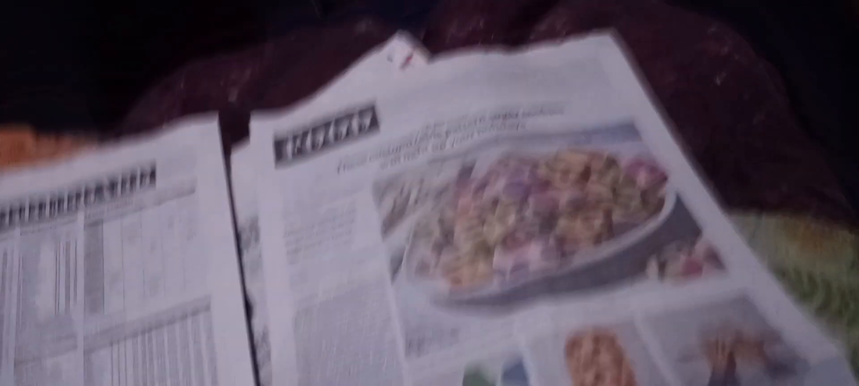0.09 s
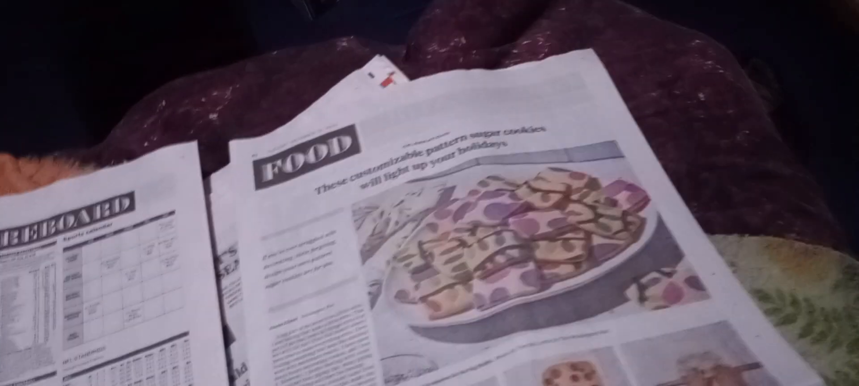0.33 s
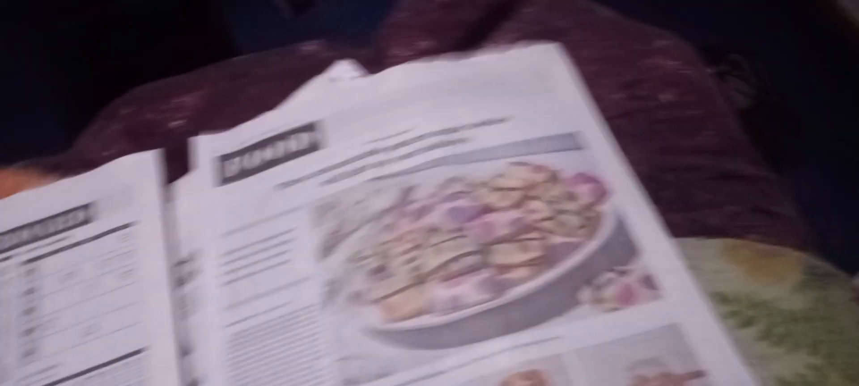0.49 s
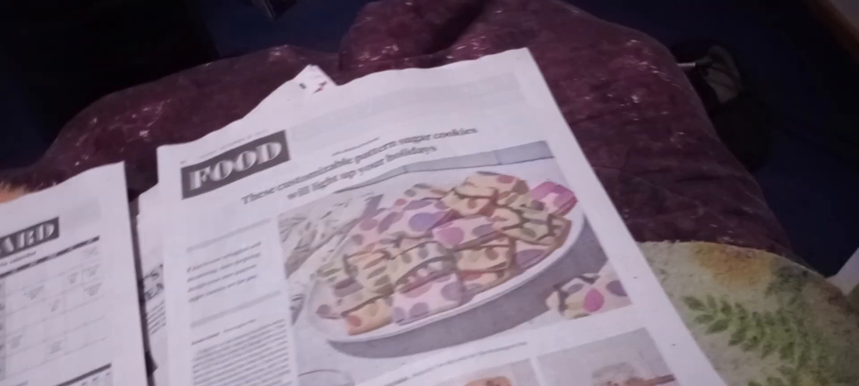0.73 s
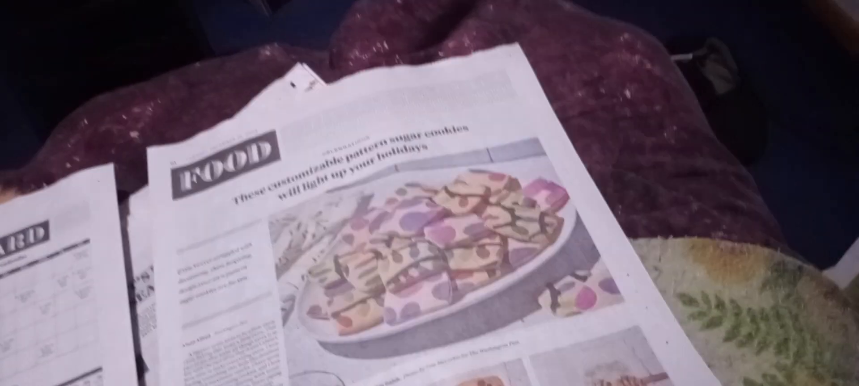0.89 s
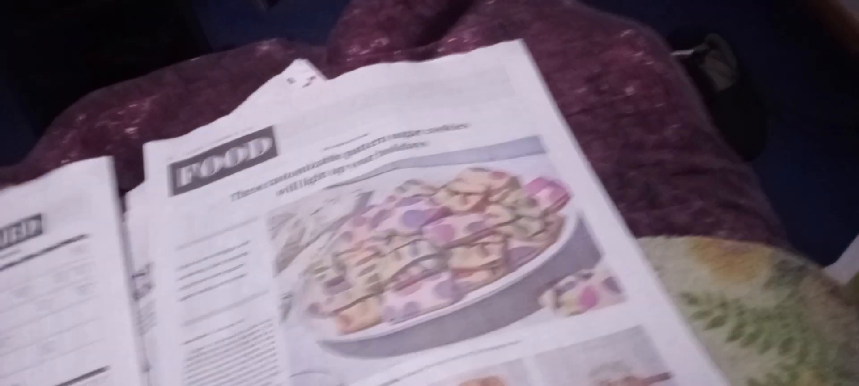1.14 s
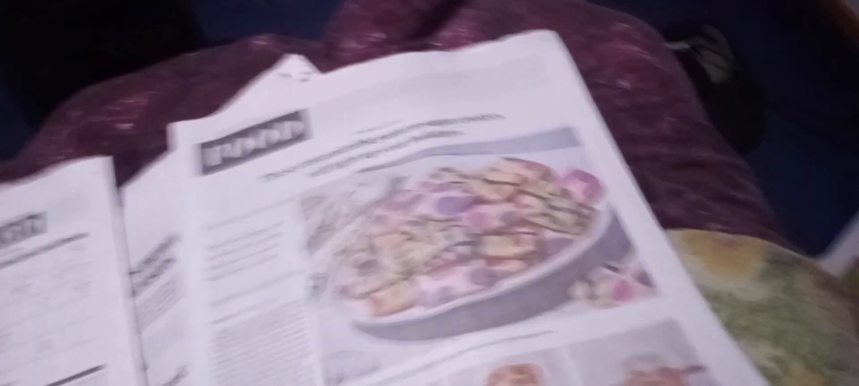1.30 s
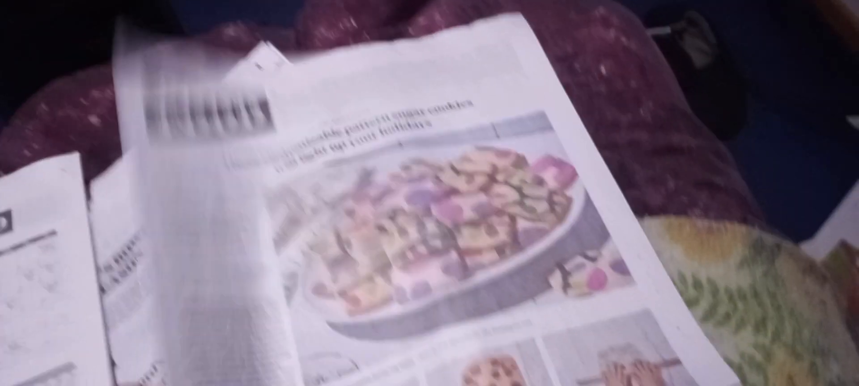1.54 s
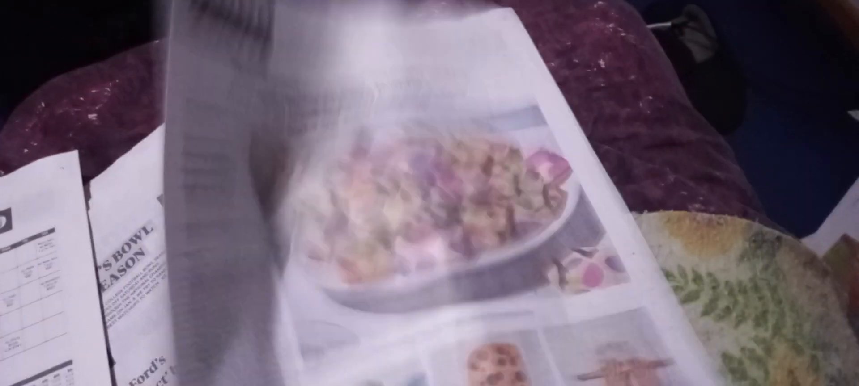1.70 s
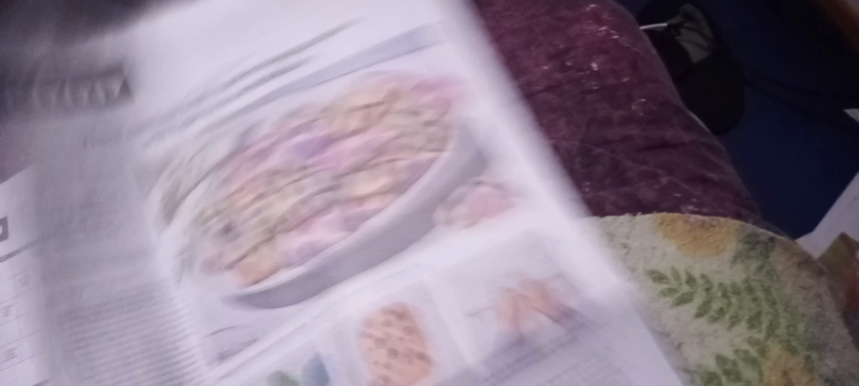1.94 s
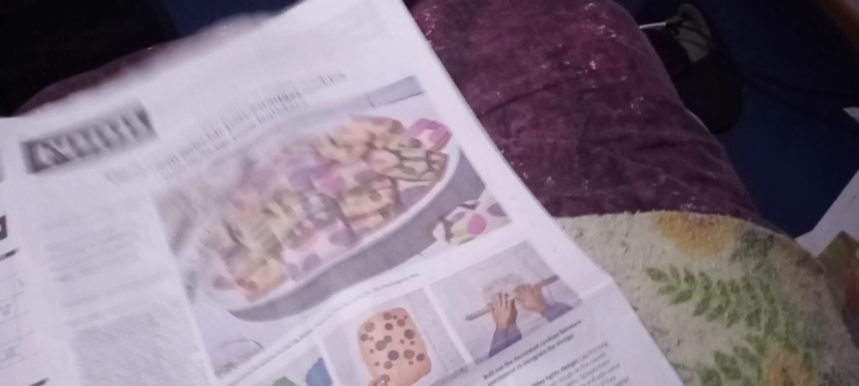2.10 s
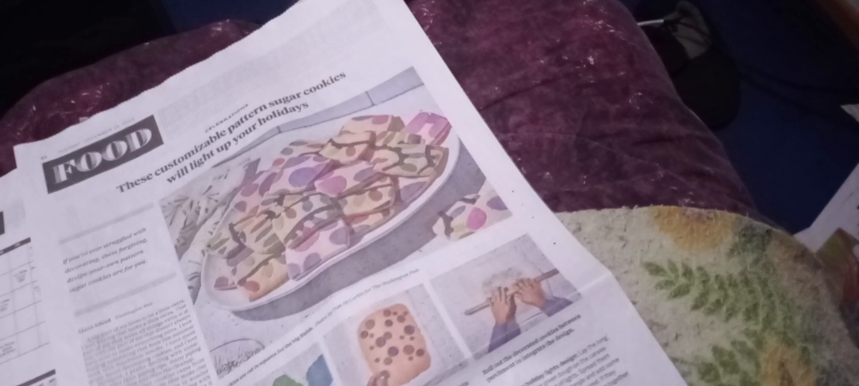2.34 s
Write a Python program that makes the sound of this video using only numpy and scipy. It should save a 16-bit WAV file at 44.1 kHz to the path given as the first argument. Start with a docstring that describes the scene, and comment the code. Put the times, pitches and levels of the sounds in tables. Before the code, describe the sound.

Thin newsprint sheets being turned by hand, crisp crackling bursts with sharp little snaps, close up

```python
"""Turning newsprint pages

Pages are lifted, slid and turned by hand close to a camera in a quiet, soft room.
Sliding sheets hiss (noise), creases crackle (dense tiny cracks), folds snap (short ringing bursts).
A drifting narrow noise is one sheet gliding on another; a low rumble and a steady hiss lie beneath.
Two unlike microphone ports colour the paper: the left loud, boxy and a little late, the right faint and bright."""
import sys
import numpy as np
from scipy import signal
from scipy.fft import rfft, irfft
from scipy.io import wavfile
from scipy.ndimage import uniform_filter1d

SR = 44100
rng = np.random.default_rng(int(sys.argv[2]) if len(sys.argv) > 2 else 0)


def persist_wave(psi):
    """Save psi, clipped to +-1, as 16-bit WAV."""
    counts = np.round(np.clip(psi, -1, 1) * 32767).astype(np.int16)
    wavfile.write(sys.argv[1], SR, np.atleast_2d(counts).T)


def elevation(decibels):
    """Turn decibel levels (scalar or array-like) into linear amplitude ratios."""
    levels = np.asarray(decibels, float)
    return 10 ** (levels / 20)


N = 110250  # samples, 2.5 s
HZ = np.fft.rfftfreq(N, 1 / SR) + 1e-3  # every frequency, nudged off zero so that we can divide by it

# level of the crackle of creases (time [s], middle [dB], body [dB], edge [dB])
CRACKLE_LEVELS = [(0, -78, -81, -78.5), (.19, -68, -75, -66.5), (.22, -40, -53, -52.5),
                  (.32, -60, -64, -60), (.35, -46.5, -71, -61), (.36, -41.5, -56, -43),
                  (.405, -43, -50.5, -41.5), (.49, -61.5, -69, -60.5), (.505, -52, -43, -67),
                  (.513, -45, -38, -43), (.535, -45, -59.5, -51.5), (.7, -41.5, -50.5, -47),
                  (.81, -33, -48.5, -45), (.91, -38.5, -58, -35), (.935, -32, -39, -43),
                  (.975, -27.5, -39, -31.5), (1.05, -40.5, -49.5, -48), (1.2, -44, -57.5, -46),
                  (1.27, -59, -67, -80), (1.51, -63, -86, -70), (1.535, -48, -57.5, -77),
                  (1.6, -53, -76, -63), (1.645, -41, -45.5, -40.5), (1.71, -38.5, -54, -39),
                  (1.81, -32, -42, -42), (1.93, -36, -52.5, -42), (2.1, -38.5, -46, -59),
                  (2.15, -53, -72, -69), (2.2, -54.5, -63, -56), (2.33, -51.5, -70, -58),
                  (2.44, -58.5, -74, -61), (2.5, -55, -74, -47.5)]
# level of the hiss of sliding sheets (time [s], treble [dB], top [dB])
SLIDE_LEVELS = [(0, -84.5, -100), (.19, -75, -79), (.225, -43.5, -57), (.28, -58.5, -66), (.32, -55.5, -92),
                (.35, -53, -70), (.36, -44.5, -66), (.41, -44.5, -63), (.49, -57, -89), (.52, -51, -65),
                (.56, -51.5, -81), (.7, -43, -59), (.8, -34.5, -52), (.88, -40, -46.5), (1.0, -40.5, -49.5),
                (1.15, -44, -55), (1.21, -59, -69), (1.27, -77, -74), (1.6, -59.5, -73), (1.66, -50, -64.5),
                (1.81, -38, -45.5), (1.91, -44.5, -58.5), (2.08, -47, -64), (2.13, -65.5, -72.5),
                (2.33, -55.5, -65), (2.44, -62, -67.5), (2.5, -53.5, -61)]
# level of the low flapping of a sheet (time [s], level [dB])
FLAP_LEVELS = [(0, -74.5), (.84, -68.5), (.89, -53.5), (.92, -69.5), (.975, -45.5), (1.05, -74.5),
               (1.66, -82.5), (1.7, -57), (1.72, -47.5), (1.81, -52), (1.89, -75), (2.04, -59.5),
               (2.14, -77), (2.5, -80)]
# upper edges of the layers, from low to high
FLAP_HZ, BODY_HZ, MIDDLE_HZ, EDGE_HZ, SLIDE_HZ = 647, 1428, 2750, 4000, 9500
CRACKS_PER_S, CRACK_SPREAD_DB, CRACK_DECAY_MS = 1800, 3.8, 0.9
PATCHY_DB = 1  # how much each crackle layer wavers

# folds that snap; edge, treble and knock are relative to the ring
# (time [s], ring [dB before SNAP_LIFT_DB], edge [dB], treble [dB], knock [dB], length [ms])
SNAPS = [(0.218, -27, -7, -10, -23, 1.2), (0.231, -23, -0.5, -25, -11.5, 0.95),
         (0.357, -32, -10, 1, -7.5, 2.5), (0.37, -23.5, -3.5, -13, -22, 2.7), (0.509, -21, 1, -13, -8, 6.5),
         (0.576, -25.5, 0, -10, -20, 1.37), (0.637, -15.5, -4.5, -34, -16, 1),
         (0.658, -20.5, -23, -15, -1.5, 1.55), (0.678, -11.5, 0.5, -9, -11.5, 1.5),
         (0.72, -20, -1, 0.5, -7, 1.81), (0.771, -21, 2, -2, -8.5, 0.99), (0.832, -11, -13, -27, -28, 0.87),
         (0.862, -14, -30, -14, -28, 1.25), (0.931, -14, -10, -24, -19, 2.95),
         (0.943, -12.5, -7, -9, -6, 1.34), (0.969, -16, -11, -23, -5, 3.4),
         (1.085, -21.5, 7.5, -2, -2.5, 2.5), (1.191, -23, -20, -10, -9.5, 1.8),
         (1.328, -31.5, -18, -25, -18, 0.95), (1.386, -36, 0.5, -20.5, -7, 4.64),
         (1.54, -26, -38, -23, -34, 1.4), (1.64, -20, -14, -12, 2.5, 0.79), (1.713, -23, 2, -17, -16, 2),
         (1.717, -18, 5.5, -8, -11, 1.55), (1.722, -11.5, -13, -17, -15, 0.72),
         (1.725, -13.5, -6.5, -5, -10.5, 2.8), (1.836, -14.5, 1, -20, -13, 1.5),
         (1.953, -18, -7, -26, -12, 2.25), (1.96, -23, -14, -22, -12, 2.6),
         (1.968, -16.5, 3.5, 4, -11, 0.706), (2.017, -11, -22, -9, -22, 1.5),
         (2.037, -13.5, -7, -8.5, -21, 2.05), (2.056, -18.5, -1, -15, -20.5, 2),
         (2.084, -24, 3.5, -27, -24, 5.2), (2.199, -19.5, -16, -24, -30, 4.3),
         (2.428, -30, -25, -8, -31, 1.53)]
# resonances of ring, edge, treble and knock (pitch [Hz], width [fraction of the pitch])
SNAP_PARTS = [(1895, 0.77), (3460, 0.73), (7170, 1.11), (780, 0.86)]
SNAP_LIFT_DB = 2.5

# airy tone of one sheet gliding over another (time [s], pitch [Hz], level [dB])
GLIDE_PATH = [(2.121, 3500, -91), (2.17, 4200, -56.5), (2.272, 3930, -60), (2.38, 3533, -71.5),
              (2.5, 4220, -53)]
GLIDE_HALF_WIDTH_HZ = 110

# colour of the left port (frequency [Hz], gain [dB])
LEFT_COLOUR = [(100, -5.5), (400, -13), (1150, -11.5), (2000, -3), (2800, -7.5), (3200, -9.5), (3800, -8.5),
               (5000, -18), (6200, -6), (7200, -11), (8500, -33), (10000, -55), (15000, -55), (15900, -29)]
# colour of the right port (frequency [Hz], gain [dB])
RIGHT_COLOUR = [(100, -3.5), (400, -17.5), (1200, -25.5), (3000, -29.5), (7000, -27), (8500, -38.5),
                (10800, -26), (13000, -37.5), (15300, -27.5), (15900, -67)]
LEFT_LAG = 56  # samples
ALIKE_BASS, ALIKE_TREBLE, ALIKE_HZ = 0.9, 0.036, 1540  # share of one wave in both ports; where it falls
ROOM_DB, ROOM_T60_S = -13, 0.16  # tail energy against the direct sound; time to fade by 60 dB

# level of the rumble of the hand-held camera (time [s], level [dB])
RUMBLE_LEVELS = [(0, -82), (.16, -64), (.21, -76), (.45, -69), (.76, -79.5), (.8, -69.5), (1.28, -77),
                 (1.37, -61), (1.5, -75.5), (2.38, -72)]
RUMBLE_RIGHT_DB = -10  # against the left
# colour of room tone and microphone hiss, only its shape counts (frequency [Hz], density [dB per Hz])
TONE_COLOUR = [(59, -59), (100, 2), (150, 5), (215, 0), (397, -8), (600, -24), (4550, -10.5), (8240, -37),
               (15900, -70)]
# left minus right of that hiss (frequency [Hz], difference [dB])
TONE_BALANCE = [(60, 4), (400, 23), (2380, 12), (8120, 1), (15000, -10)]
TONE_DB = -74
TOP_HZ = 15930  # the camera cuts the sound above this


def shape(table):
    """Reads a colour table in dB at every frequency, evenly along a pitch scale."""
    hz, db = np.array(table, float).T
    return np.interp(np.log(HZ), np.log(hz), db)


def curves(table):
    """Turns the dB columns of a table over time into gains at every sample."""
    s, *columns = np.array(table, float).T
    t = np.arange(N) / SR
    return [elevation(np.interp(t, s, db)) for db in columns]


def causal(table):
    """Gives a colour its minimum-phase response, which rings only after the sound and never ahead of it."""
    cepstrum = irfft(shape(table) * np.log(10) / 20, N)
    cepstrum[1:N // 2] *= 2
    cepstrum[N // 2 + 1:] = 0
    return np.exp(rfft(cepstrum))


def band(x, lo_hz, hi_hz, order=4):
    """Keeps the band between two frequencies; a higher order gives steeper sides."""
    low_side = 1 + (lo_hz / HZ) ** (2 * order)
    high_side = 1 + (HZ / hi_hz) ** (2 * order)
    return irfft(rfft(x) / np.sqrt(low_side * high_side), N)


def unit(x):
    """Scales a stereo sound so that the average of its two sides has an rms of 1."""
    return x / np.sqrt(np.mean(x.mean(axis=0) ** 2))


def walk(rate):
    """Wanders at random: levels held 1 / rate seconds, then smoothed twice; spread near 1."""
    hold = int(SR / rate)
    steps = np.repeat(rng.standard_normal(N // hold + 1), hold)
    smooth = uniform_filter1d(uniform_filter1d(steps, hold), hold)
    return 1.57 * smooth[:N]


def pair(envelope):
    """Makes noise under an envelope for the two ports: alike in the bass, mostly unlike above."""
    a, b = rfft(envelope * rng.standard_normal((2, N)))
    share = ALIKE_TREBLE + (ALIKE_BASS - ALIKE_TREBLE) / (1 + (HZ / ALIKE_HZ) ** 4)
    return irfft(np.array([a, share * a + np.sqrt(1 - share ** 2) * b]), N)


def ports(x):
    """Filters each side by the colour of its microphone port and delays the left one."""
    lag = np.exp(-2j * np.pi * HZ * LEFT_LAG / SR)
    return irfft(rfft(x) * np.array([causal(LEFT_COLOUR) * lag, causal(RIGHT_COLOUR)]), N)


def cracks():
    """Envelope of dense tiny cracks: random hits of widely spread size that die fast and come in swarms."""
    sizes = elevation(CRACK_SPREAD_DB * np.minimum(rng.exponential(size=N), 5))
    hits = (rng.random(N) < CRACKS_PER_S / SR) * sizes
    keep_per_sample = np.exp(-1000 / (CRACK_DECAY_MS * SR))
    dying = signal.lfilter([1], [1, -keep_per_sample], hits)
    return dying * elevation(2.16 * walk(40.86))


def grain(swarm, lo_hz, hi_hz):
    """One wavering band of cracking noise: the common swarm plus cracks of its own."""
    noise = ports(pair(1.06 * swarm + cracks()))
    return elevation(PATCHY_DB * walk(14.995)) * unit(band(noise, lo_hz, hi_hz))


def crackling(swarm):
    """Creases give way: large ones crack low, small ones high, each band with its own level."""
    middle, body, edge = curves(CRACKLE_LEVELS)
    low = body * grain(swarm, FLAP_HZ, BODY_HZ)
    mid = middle * grain(swarm, BODY_HZ, MIDDLE_HZ)
    high = edge * grain(swarm, MIDDLE_HZ, EDGE_HZ)
    return low + mid + high


def sliding(swarm):
    """Sheets rub on each other: a wavering high hiss with a trace of the cracks."""
    treble, top = curves(SLIDE_LEVELS)
    hiss = ports(pair(elevation(2 * walk(59.36)) + 0.043 * swarm))
    treble_hiss = treble * unit(band(hiss, EDGE_HZ, SLIDE_HZ, order=8))
    return treble_hiss + top * unit(band(hiss, SLIDE_HZ, SR / 2, order=8))


def flapping(swarm):
    """A sheet flaps: the lowest band of cracking noise under its own level curve."""
    return curves(FLAP_LEVELS)[0] * grain(swarm, 266, FLAP_HZ)


def rustle():
    """Crackling, sliding and flapping of the sheets, tied together by one common swarm of cracks."""
    swarm = cracks()
    return crackling(swarm) + sliding(swarm) + flapping(swarm)


def snap_resonances(f):
    """Responses of ring, edge, treble and hollow knock: peaks of alternate sign with the bass cut."""
    peaks = []
    for k, (hz, width) in enumerate(SNAP_PARTS):
        peak = 1 / (1 + 1j * (f / hz - hz / f) / width) ** 2
        peaks.append((-1) ** k * peak / (1 + (500 / f) ** 6))
    return np.array(peaks)


def snaps():
    """Each fold buckles in a short burst that swells and dies, shared out over its four resonances."""
    out, size = np.zeros((2, N)), 2048
    t, f = np.arange(size) / SR, np.fft.rfftfreq(size, 1 / SR) + 1
    peaks = snap_resonances(f)
    click = np.ones((2, 1)) * (np.arange(N) == 0)
    response = rfft(ports(click)[:, :size])
    for s, ring_db, *rel_db, ms in SNAPS:
        u = 2000 * t / ms  # time in halves of the length
        a, b = rng.standard_normal((2, size)) * u ** 0.66 * np.exp(-u)
        a[int(np.argmax(u > 1))] += 5.8 / ms  # the crease gives way in one sharp click
        burst = rfft(np.array([a, 1.1 * a + 0.55 * b])) * response
        parts = irfft(burst * peaks[:, None], size)
        # each part is set by its peak at the left port
        gains = elevation(ring_db + np.array([0, *rel_db])) / np.abs(parts[:, 0]).max(axis=1)
        i = int(s * SR) - LEFT_LAG  # start early so that the late left port is on time
        out[:, i:i + size] += np.tensordot(gains, parts, 1)[:, :N - i]
    return elevation(SNAP_LIFT_DB) * out


def glide():
    """A sheet glides on another: narrow noise moved up to a drifting pitch, mostly at the left port."""
    s, hz, db = np.array(GLIDE_PATH, float).T
    t = np.arange(N) / SR
    turn = np.exp(2j * np.pi * np.cumsum(np.interp(t, s, hz)) / SR)
    a, b = band(rng.standard_normal((2, N)), 0, GLIDE_HALF_WIDTH_HZ, order=1)
    airy = np.real((a + 1j * b) * turn)
    return elevation(np.interp(t, s, db)) * unit(ports(airy * np.ones((2, 1))))


def room(x):
    """Cloth and walls add a short tail: fading noise, separate for each side, that follows every sound."""
    t = np.arange(SR // 3) / SR
    tail = rng.standard_normal((2, len(t))) * elevation(-60 * t / ROOM_T60_S) * (t > 0.003)
    tail /= np.sqrt(np.sum(tail ** 2, axis=1, keepdims=True))
    return x + elevation(ROOM_DB) * signal.fftconvolve(x, tail, axes=1)[:, :N]


def rumble():
    """A low narrow noise through the camera body: the same wave in both ports, weaker in the right."""
    x = band(rng.standard_normal(N), 59, 92)
    return curves(RUMBLE_LEVELS)[0] * unit(np.array([x, x * elevation(RUMBLE_RIGHT_DB)]))


def tone():
    """Steady hiss of room and microphones: coloured noise, shared by the two sides in the bass."""
    a, b = rfft(rng.standard_normal((2, N)))
    share = 1 / (1 + (HZ / 400) ** 2)
    right = (share * a + np.sqrt(1 - share ** 2) * b) * elevation(-shape(TONE_BALANCE))
    return elevation(TONE_DB) * unit(irfft(np.array([a, right]) * elevation(shape(TONE_COLOUR)), N))


def scene():
    """The paper sounds in the room, with rumble and steady hiss added beneath."""
    paper = rustle() + snaps() + glide()
    return room(paper) + rumble() + tone()


def band_limit(x):
    """A steep low-pass at the top of the band."""
    return signal.sosfilt(signal.butter(12, 16790, fs=SR, output="sos"), x)


def record(dry):
    """The camera cuts the top of the sound with a very steep filter."""
    mix = band(dry, 0, TOP_HZ, order=100)
    return band_limit(mix)


dry = scene()
out = record(dry)
persist_wave(out)
```